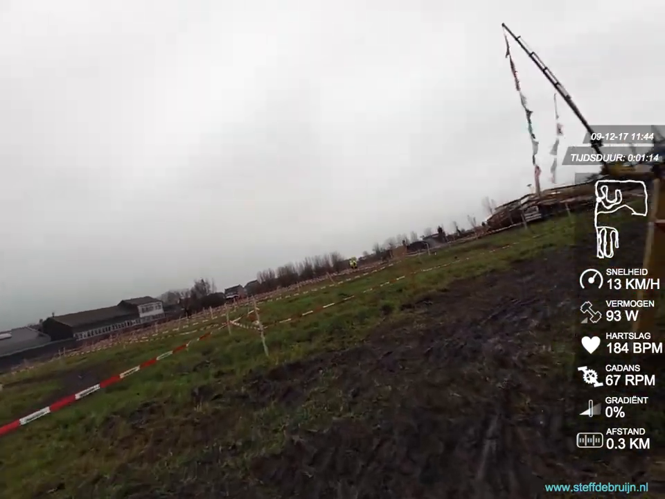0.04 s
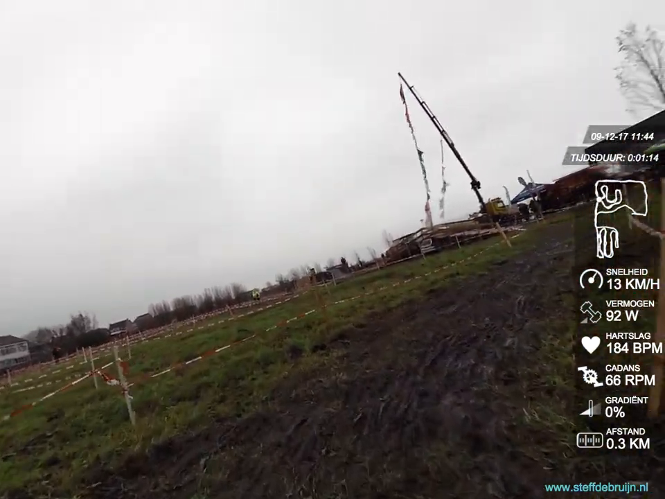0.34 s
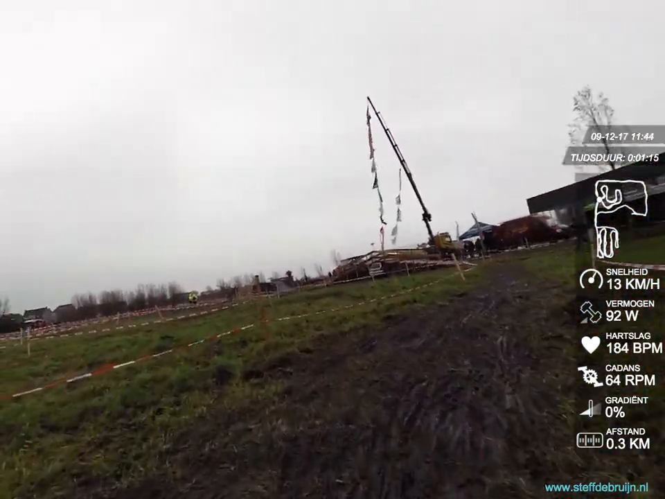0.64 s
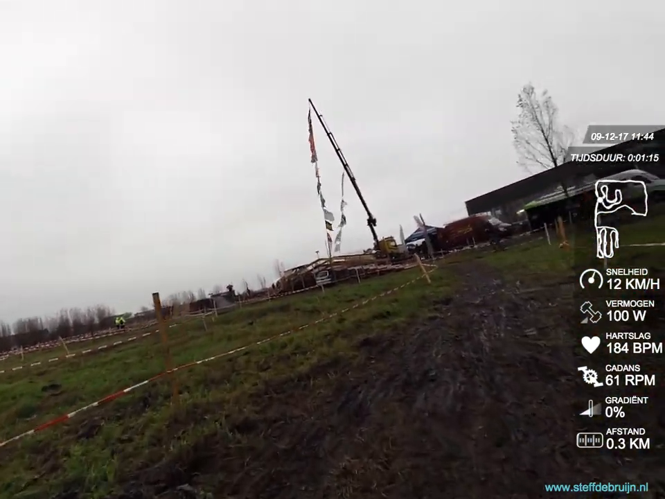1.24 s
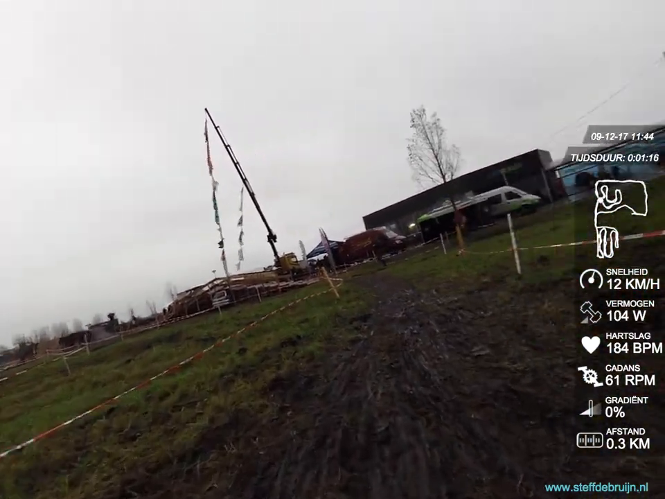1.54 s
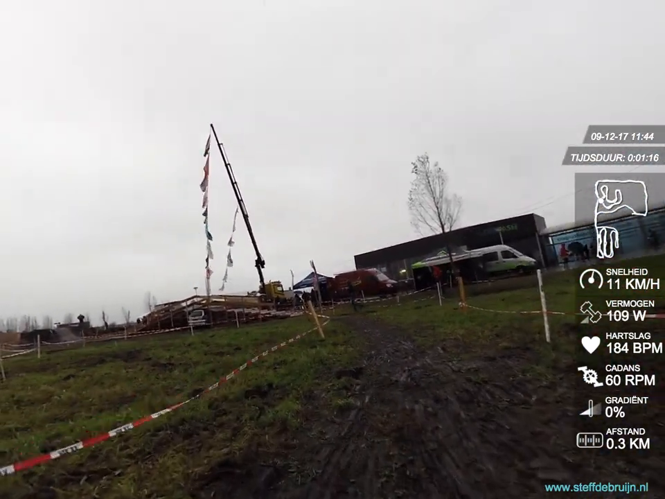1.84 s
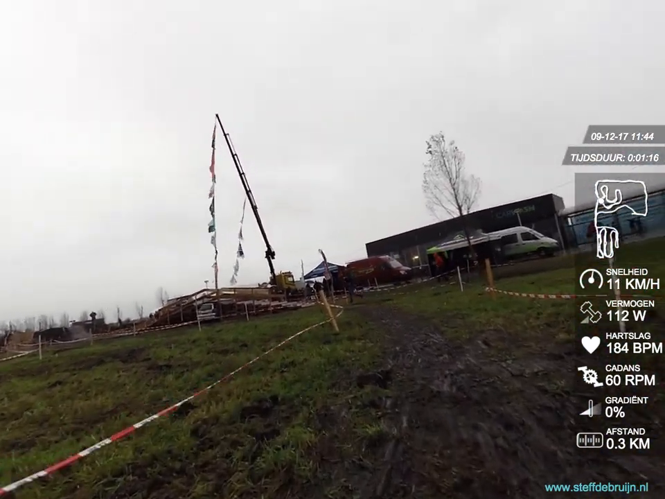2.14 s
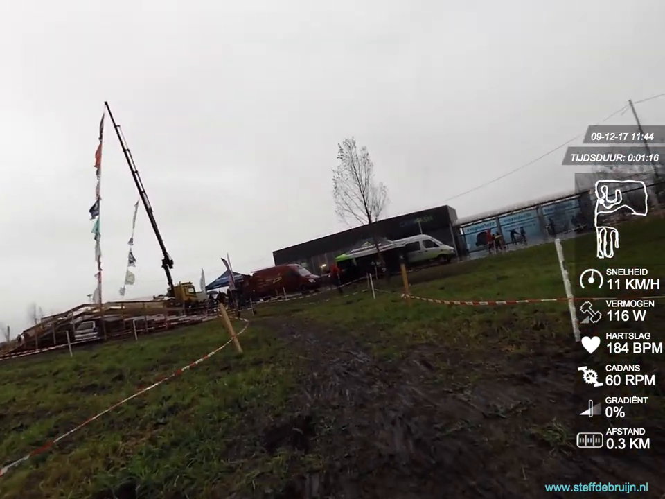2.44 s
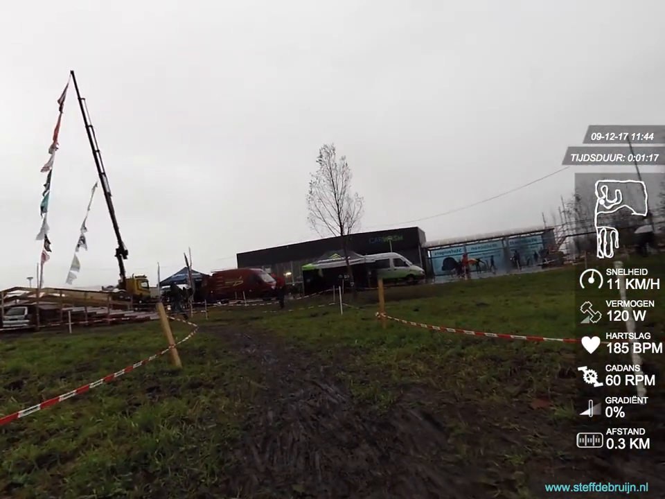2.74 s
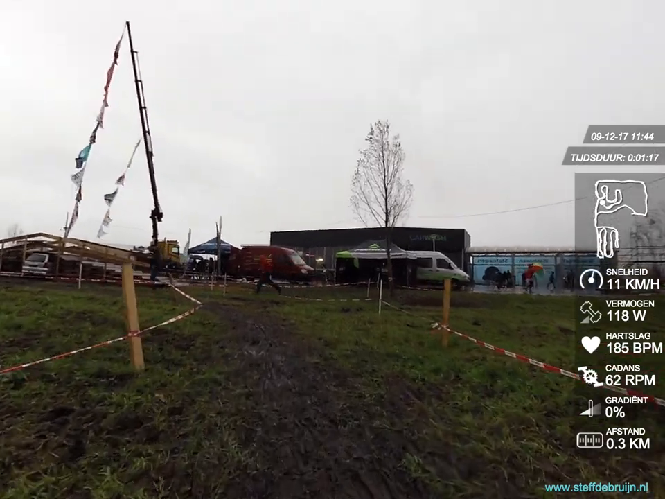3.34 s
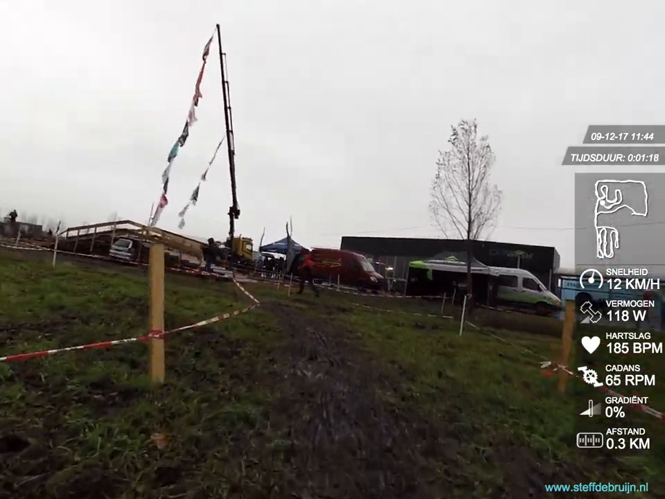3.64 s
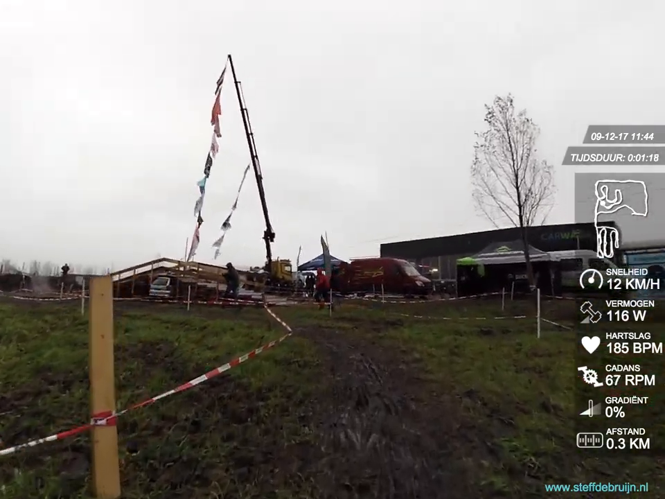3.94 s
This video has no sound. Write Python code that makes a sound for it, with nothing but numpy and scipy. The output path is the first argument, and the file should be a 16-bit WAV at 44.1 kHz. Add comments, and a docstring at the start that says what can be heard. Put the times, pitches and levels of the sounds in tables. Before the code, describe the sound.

A bicycle rolls slowly over a rutted muddy track, heard from a microphone fixed to it. Its hollow drone and bright ring carry constant short rattles, occasional thumps and sharp ticks, with a thin chain whistle and faint wind rumble.

```python
"""On a rutted muddy track, a bicycle rolls slowly along, heard from a camera fixed to it.
Tyres and chain shake the frame and the camera housing, which ring at fixed pitches:
a hollow drone near 500 Hz and a bright ring near 2.5 kHz. The chain adds a thin whistle.
Bumps set off short rattles, the wheels thump into ruts, and stones and loose parts
tick against the bike. Wind rumbles underneath."""
import sys
import numpy as np
from scipy import signal
from scipy.fft import rfft, irfft
from scipy.io import wavfile
from scipy.ndimage import uniform_filter1d, minimum_filter1d

SR = 44100
rng = np.random.default_rng(int(sys.argv[2]) if len(sys.argv) > 2 else 0)


def wrap_up_sound(samples):
    """Save the sound to the file named by the first command line argument, as 16-bit audio."""
    columns = np.atleast_2d(samples).T
    # keep every value between -1 and 1, then stretch to whole-number steps
    tamed = np.clip(columns, -1, 1)
    steps = np.round(tamed * 32767).astype(np.int16)
    wavfile.write(sys.argv[1], SR, steps)


N = 176400
TIME = np.arange(N) / SR
FREQS = np.maximum(np.arange(N + 1) * SR / (2 * N), 1)

# Overall tone of the body (frame and housing): frequency_hz, level_db
BODY_COLOUR = [(25, -27.5), (45, -27.5), (70, -18), (110, -3.5), (240, -3.5), (740, 4.5), (860, -16),
               (2150, -22.5), (2750, -16.5), (3050, -19.5), (3700, -25.5), (3900, -11), (4780, -15),
               (4980, -20), (5200, -27), (6300, -51.5), (7000, -61.5), (8200, -62), (9000, -73.5)]
# Pitches at which the body rings: pitch_hz, width_hz, boost_db
BODY_RESONANCES = [(101.3, 14, 15), (152, 75, 8.5), (305.6, 82, 13), (413, 110, 4), (491.2, 50.3, 14.5),
                   (610, 23, 2.5), (941, 120, 9.5), (1162.6, 128, 17), (1289, 54, 9), (1444, 180, 14),
                   (1884, 324, 17), (2364, 130, 6.5), (2469, 408, 25), (2473, 39, 4), (3254, 220, 10.5),
                   (3483, 98, 11.5), (4560, 190, 6.5)]
# Edges of five bands, low to high (boom, thud, clatter, ring, sizzle): edge_hz
BAND_EDGES_HZ = [70, 220, 900, 2200, 3000, 11000]
# Rolling noise over time, before the offsets below: time_s, thud_db, clatter_db, ring_db, sizzle_db
ROLLING_LEVELS = [(0.0, -33.5, -41, -30, -32), (0.13, -29, -35.5, -30, -40), (0.26, -30, -37, -31.5, -36.5),
                  (0.76, -27.5, -40, -32.5, -40.5), (1.24, -27, -37, -28, -36.5),
                  (1.61, -29, -40, -32, -40.5), (1.78, -27.5, -39, -31, -38.5),
                  (2.25, -28, -39.5, -31, -40), (2.37, -26.5, -36.5, -30, -35),
                  (2.56, -28, -41.5, -36, -39.5), (2.71, -28.5, -39, -30, -40),
                  (2.93, -28.5, -35, -30, -37), (3.12, -28.5, -42, -32.5, -40),
                  (3.34, -28, -36.5, -29, -37), (3.49, -29, -39, -31.5, -38),
                  (3.69, -26.5, -39.5, -29, -38.5), (3.82, -27, -37.5, -32.5, -36),
                  (4.0, -22, -36, -29.5, -38)]
# One row each for the rolling thud, clatter, ring and sizzle: offset_db, flutter_db
ROLLING_BANDS = [(2, 1.93), (1.1, 2.2), (0.78, 3), (-1.5, 2.5)]
# Brief changes in the rolling noise, nearly all of them dips: time_s, change_db
LULLS = [(.008, -1.5), (0.246, -1.5), (.436, -3), (0.759, 1.5), (0.858, -1.5), (0.967, -3.5), (1.079, -2.5),
         (1.278, -4), (1.612, -1), (1.9, -3), (2.09, -5.5), (2.314, -2.5), (2.38, -6.5), (2.767, -8),
         (2.803, -2.5), (2.875, -6.5), (3.19, -4.5), (3.225, -3), (3.814, -3.5), (3.945, -6)]
# Bumps that shake the bike: peak_s, decay_s, thud_pitch_hz, thud_db, clatter_db, ring_db
JOLTS = [(0.03, 0.0058, 433, -32, -51, -14), (0.065, 0.014, 301, -20, -42, -35),
         (0.135, 0.011, 481, -16, -42, -30), (0.187, 0.0088, 497.8, -12, -34, -33),
         (0.231, 0.0068, 315, -24, -34, -24), (0.292, 0.0063, 608, -21, -37, -17.5),
         (0.341, 0.013, 257, -21, -29, -16), (0.385, 0.011, 506, -18, -31.5, -19.5),
         (0.411, 0.011, 532, -31, -23.5, -21), (0.456, 0.012, 423, -36, -42, -19.5),
         (0.496, 0.0097, 300, -14, -34, -22.5), (0.535, 0.0054, 520, -19, -31, -48),
         (0.554, 0.012, 484, -11, -27.5, -45), (0.608, 0.022, 507, -22.5, -25, -20.5),
         (0.652, 0.012, 497, -24, -27, -27), (0.705, 0.009, 474.4, -15.5, -30, -18.5),
         (0.721, 0.0052, 460, -28, -23, -14.5), (0.804, .011, 490, -12.5, -39.5, -20.5),
         (0.832, 0.015, 515.7, -17.5, -47, -44), (0.927, .009, 727, -17, -37, -24),
         (0.99, 0.0087, 505.4, -23.5, -32, -18.5), (1.015, 0.016, 391, -17, -45, -25),
         (1.043, 0.01, 479, -17.5, -27, -23.5), (1.149, 0.0076, 312, -13.5, -31, -20.5),
         (1.178, 0.014, 504, -16, -40, -36), (1.324, 0.013, 487.5, -6.5, -40, -38),
         (1.4525, 0.0097, 479, -13, -20, -9.5), (1.466, 0.014, 453.6, -16, -30, -17),
         (1.5, 0.0083, 464, -35, -31, -18.5), (1.529, 0.016, 509.5, -18, -32, -16.5),
         (1.649, 0.01, 515, -12, -17.5, -15.5), (1.658, 0.0074, 628, -10, -30, -8.5),
         (1.667, 0.0098, 463, -14, -27, -14.5), (1.71, .008, 691.5, -10, -22, -14.5),
         (1.808, 0.012, 529, -15.5, -51, -49), (1.877, 0.01, 476, -13, -28.5, -29),
         (1.92, 0.0037, 296.5, -30, -39, -21.5), (1.968, 0.0052, 487, -17, -24.5, -13),
         (1.992, 0.024, 490, -16.5, -34.5, -36), (2.034, 0.0084, 433, -30, -37, -20.5),
         (2.112, 0.01, 424, -11.5, -27, -29), (2.152, 0.011, 431.4, -13.5, -42, -25),
         (2.213, 0.013, 484, -18, -35, -21.5), (2.259, 0.0057, 461.6, -13, -24.5, -15.5),
         (2.283, 0.011, 516.4, -8, -50.5, -48), (2.366, 0.0047, 357, -12.5, -26, -20),
         (2.475, 0.0072, 356, -17, -26.5, -17), (2.513, 0.0095, 284, -21, -31, -21),
         (2.559, 0.0088, 463, -14, -24, -18), (2.59, 0.0051, 475, -15, -25, -15.5),
         (2.612, 0.014, 570, -15, -25, -24), (2.641, 0.0067, 485, -9.5, -26, -27),
         (2.655, 0.0105, 556, -19.5, -31, -23), (2.72, 0.0078, 482, -17.5, -29.5, -29),
         (2.74, 0.006, 598, -14, -41, -43), (2.839, 0.013, 513, -14.5, -32, -19.5),
         (2.857, 0.0066, 286, -17, -49, -36), (2.909, 0.011, 491.5, -11, -28, -28),
         (2.99, 0.01, 493, -21.5, -24.5, -17), (3.037, 0.01, 517, -13, -52, -46),
         (3.083, 0.0085, 374, -18, -26, -25), (3.108, 0.0059, 623, -12.5, -37, -27),
         (3.16, 0.0079, 618, -8.5, -28, -25), (3.172, .009, 478, -26, -44, -28),
         (3.278, 0.012, 482, -14.5, -25, -20.5), (3.31, 0.0081, 486, -15.5, -42, -26),
         (3.414, 0.015, 491.6, -11.5, -31, -24), (3.476, 0.0082, 475.4, -12, -28.5, -18),
         (3.509, 0.01, 496, -14, -26, -23), (3.635, 0.0082, 439, -19.5, -25.5, -23),
         (3.678, .014, 491.5, -15, -40, -26), (3.706, 0.0073, 349.7, -21.5, -28.5, -18.5),
         (3.736, 0.011, 504, -24, -44, -42), (3.8, 0.0085, 486.3, -14.5, -43, -26),
         (3.844, 0.0066, 338.8, -7.5, -23.5, -26), (3.866, 0.012, 444, -17, -28.5, -22.5),
         (3.9095, 0.0068, 475, -2, -27, -43), (3.992, 0.012, 393.3, -4, -26, -22.5)]
# Added to every jolt's thud, clatter and ring: offset_db
JOLT_OFFSETS_DB = [-5.5, -4.5, -3.5]
# A wheel drops into a rut: peak_s, pitch_hz, level_db
THUMPS = [(0.895, 151.5, -21.5), (1.146, 157, -24), (1.318, 135, -29), (1.443, 150.9, -24.5),
          (2.404, 162, -27.5), (2.68, 229, -21.5), (2.747, 227, -26), (2.782, 130.3, -29.5),
          (3.083, 181, -24.5), (3.16, 302.6, -19), (3.856, 172.4, -25), (3.908, 154, -17.5),
          (3.992, 157, -15)]
# Stones and loose parts hit the bike: time_s, crack_db, knock_db, knock_pitch_hz, snap_db
TICKS = [(0.411, -37, -22, 4000, -79.5), (1.452, -29, -25, 2500, -40), (1.4545, -27, -26, 2505, -45),
         (1.597, -13.5, -17, 3600, -41), (1.649, -17, -21, 1900, -43), (1.666, -32, -19.5, 1900, -55),
         (2.364, -34, -25, 1400, -80), (2.738, -25, -11.5, 3280, -79), (2.740, -34, -12.5, 925, -82),
         (3.157, -40, -18, 1790, -80), (3.411, -34, -20, 4100, -80), (3.839, -23, -12, 1700, -62),
         (3.845, -18, -8.5, 1720, -45), (3.98, -28, -14, 3300, -63), (3.990, -20, -8.5, 1655, -57)]
# Tone of a tick's sharp crack, lower knock and thin, high snap: frequency_hz, level_db
CRACK_COLOUR = [(500, -20), (2500, -22.5), (3500, 0.5), (4500, 0.5), (5500, -12), (6400, -24), (7100, -48),
                (12000, -70)]
KNOCK_COLOUR = [(60, -31), (400, -7), (700, -1), (930, 2), (1250, -8), (1700, -3), (2500, -8.5),
                (3300, -5.5), (4500, -14.5), (6000, -49), (7500, -75)]
SNAP_COLOUR = [(3000, -46.5), (6300, 6.5), (9800, -2), (11800, -11), (13000, -32)]
# Path of the whistle in the chain's hiss: time_s, pitch_hz
WHISTLE_PITCH = [(0.0, 4480), (0.23, 4420), (0.26, 4080), (0.33, 4600), (0.41, 4100), (0.52, 4425),
                 (1.0, 4415), (1.1, 4300), (1.38, 4457), (1.87, 4210), (1.92, 4370), (2.21, 4470),
                 (2.27, 4250), (2.31, 4460), (2.75, 4320), (2.77, 4483), (2.91, 4130), (2.97, 4490),
                 (3.17, 4160), (3.31, 4610), (3.43, 4390), (3.54, 4480), (3.82, 4280), (3.93, 4460),
                 (4.0, 4140)]
# The deepest sounds over time, before their boosts: time_s, wind_db, boom_db
BASS_LEVELS = [(0.0, -63, -37), (0.65, -65, -36.5), (0.78, -65, -39), (1.05, -59.5, -37.5),
               (1.48, -61.5, -39), (2.22, -58.5, -35), (2.38, -48.5, -35.5), (2.67, -59, -35.5),
               (2.72, -39, -29), (2.92, -73, -39.5), (3.1, -42.5, -33), (3.22, -76, -40),
               (3.41, -48.5, -30), (3.44, -62, -35.5), (3.75, -64, -34.5), (3.96, -70, -34)]


def rolling(ground_db, boom_boost_db=3):
    """Tyres and chain keep the body sounding; each band above the boom also flutters on its own."""
    boom, *bands = shaken_body()
    _, boom_db = over_time(BASS_LEVELS)
    out = from_db(boom_db + boom_boost_db) * steady(boom, window=3500)
    for band, db, (offset_db, flutter_db) in zip(bands, over_time(ROLLING_LEVELS), ROLLING_BANDS):
        level_db = db + offset_db + ground_db + flutter_db * wander(rate_hz=33.4)
        out += from_db(level_db) * steady(band, window=700)
    return out


def shaken_body():
    """Grit rings the frame and housing; gives boom, thud, clatter, ring and sizzle at equal strength."""
    resonances_db = sum(boost_db / (1 + (2 * (FREQS - pitch_hz) / width_hz) ** 2)
                        for pitch_hz, width_hz, boost_db in BODY_RESONANCES)
    sound = apply_colour(grit(), colour(BODY_COLOUR) + resonances_db)
    return [unit_level(signal.sosfiltfilt(band_filter(edges_hz, order=6), sound))
            for edges_hz in zip(BAND_EDGES_HZ, BAND_EDGES_HZ[1:])]


def grit(grains_per_s=3200, spread_db=3.5, friction_gain=0.51):
    """Many tiny impacts of uneven size over a smooth rubbing noise."""
    sizes = from_db(spread_db * np.minimum(rng.exponential(1, N), 4))
    signs = rng.choice([-1, 1], N)
    hits = rng.random(N) < grains_per_s / SR
    return unit_level(sizes * signs * hits) + friction_gain * rng.standard_normal(N)


def ground_flutter(flutter_db=0.9, lull_s=0.014):
    """Uneven ground makes the level flutter and briefly dip; gives the change in dB."""
    lulls_db = sum(db * np.exp(-((TIME - time_s) / lull_s) ** 2) for time_s, db in LULLS)
    return lulls_db + flutter_db * wander(rate_hz=33.4)


def jolts(sizzle_offset_db=-7):
    """Bumps rattle the same body, some with a hollow thud, some with a bright ring."""
    _, thud, clatter, ring, sizzle = shaken_body()
    _, _, _, *levels_db = np.transpose(JOLTS)
    envelopes = [jolt_envelope(db) for db in levels_db]
    thud_envelope, clatter_envelope, _ = envelopes
    # A thud is about half noise and half tone.
    thud = thud * (thud_envelope + 1e-6) + hollow_knocks(JOLTS, waver_hz=36.8)
    out = sizzle * clatter_envelope * from_db(sizzle_offset_db)
    for band, envelope, offset_db in zip((thud, clatter, ring), envelopes, JOLT_OFFSETS_DB):
        out += steady(band, window=300) * envelope * from_db(offset_db)
    return out


def jolt_envelope(levels_db):
    """How strongly the jolts shake one band at each moment."""
    out = np.zeros(N)
    for (peak_s, decay_s, *_), db in zip(JOLTS, levels_db):
        span, strength = bump(peak_s, decay_s)
        out[span] += from_db(db) * strength
    return out


def bump(peak_s, decay_s, hold_s=0.0027):
    """A bump swells, holds and dies away; gives the samples it covers and its strength there."""
    span = slice(max(int((peak_s - 0.04) * SR), 0), int((peak_s + 0.15) * SR))
    before_s = np.maximum(peak_s - TIME[span] - hold_s / 2, 0)
    after_s = np.maximum(TIME[span] - peak_s - hold_s / 2, 0)
    rise_s = 0.69 * decay_s
    fade = (before_s / rise_s) ** 2 + after_s / decay_s
    return span, np.exp(-np.minimum(fade, 20))


def hollow_knocks(rows, waver_hz):
    """Each knock rings for a few cycles, wavering around a pitch of its own."""
    out = np.zeros(N)
    bend_hz = waver_hz * wander(rate_hz=62.3)
    for peak_s, decay_s, pitch_hz, db, *_ in rows:
        span, strength = bump(peak_s, decay_s)
        out[span] += from_db(db) * strength * tone(pitch_hz + bend_hz[span])
    return out


def rut_thumps(decay_s=0.013):
    """A wheel dropping into a rut makes a deep, short knock."""
    rows = [(peak_s, decay_s, pitch_hz, db) for peak_s, pitch_hz, db in THUMPS]
    return hollow_knocks(rows, waver_hz=18)


def ticks(tick_decay_s=0.00077, knock_decay_s=0.0024, ring_boost_db=9):
    """Stones and loose parts hit the bike: a crack, a thin snap and a short, ringing knock."""
    crack_click, knock_click, snap_click = [apply_colour(signal.unit_impulse(N), colour(points))[:1024]
                                            for points in (CRACK_COLOUR, KNOCK_COLOUR, SNAP_COLOUR)]
    out = np.zeros(N + SR)
    for time_s, crack_db, knock_db, pitch_hz, snap_db in TICKS:
        knock = contact(knock_click, knock_decay_s)
        ring = signal.lfilter(*signal.iirpeak(pitch_hz, Q=5, fs=SR), knock)
        knock += from_db(ring_boost_db) * ring
        crack = contact(crack_click, tick_decay_s)
        snap = contact(snap_click, tick_decay_s)
        start = int((time_s - tick_decay_s) * SR)
        for hit, db in (crack, crack_db), (knock, knock_db), (snap, snap_db):
            out[start:start + len(hit)] += from_db(db) * hit / np.abs(hit).max()
    return out[:N]


def contact(click, decay_s):
    """One hard touch: a very short burst of noise that takes on the tone of the click."""
    burst = steady(rng.standard_normal(1024), window=16) * np.exp(-TIME[:1024] / decay_s)
    return np.convolve(burst, click)


def chain_whistle(ground_db, base_db=-40.5, waver_hz=60.38):
    """The chain hisses in a narrow band, like a thin whistle whose pitch wanders."""
    pitch_hz = over_time(WHISTLE_PITCH)[0] + waver_hz * wander(rate_hz=18)
    flickering_tone = wander(rate_hz=89) * tone(pitch_hz)
    hiss = signal.sosfilt(band_filter([3800, 4950], order=4), flickering_tone)
    return from_db(base_db + ground_db) * steady(hiss, window=700)


def wind(boost_db=2.5):
    """Air buffets the housing: a deep, lumpy rumble."""
    rumble = signal.sosfilt(band_filter([42, 85], order=2), rng.standard_normal(N + SR))[SR:]
    wind_db, _ = over_time(BASS_LEVELS)
    return from_db(wind_db + boost_db) * steady(rumble, window=3500)


def from_db(db):
    """Turn decibels into a number to multiply a sound by."""
    return 10 ** (np.asarray(db) / 20)


def unit_level(sound):
    """Scale a sound so that its average level (rms) is 1."""
    return sound / np.sqrt(np.mean(sound ** 2) + 1e-20)


def steady(sound, window):
    """Keep the level near 1, smoothing out swells longer than the window (in samples)."""
    power = uniform_filter1d(uniform_filter1d(sound ** 2, window), window)
    return sound / np.sqrt(np.abs(power) + 1e-20)


def wander(rate_hz, step=40):
    """A smooth random curve of typical size 1; a higher rate makes it move faster."""
    memory = np.exp(-2 * np.pi * rate_hz * step / SR)
    noise = rng.standard_normal(N // step + 2002)
    slow = signal.lfilter([1], [1, -2 * memory, memory ** 2], noise)[2000:]  # skip the settling
    return np.interp(np.arange(N) / step, np.arange(len(slow)), unit_level(slow))


def tone(pitch_hz):
    """A pure tone of average level 1 that follows a moving pitch."""
    return np.sqrt(2) * np.sin(2 * np.pi * (np.cumsum(pitch_hz) / SR + rng.random()))


def over_time(rows):
    """Join a table's points with straight lines: one curve for each column after the time."""
    times_s, *columns = np.transpose(rows)
    return [np.interp(TIME, times_s, column) for column in columns]


def colour(points):
    """Join a table's points into a level in dB for every frequency."""
    frequency_hz, level_db = np.transpose(points)
    return np.interp(np.log(FREQS), np.log(frequency_hz), level_db)


def apply_colour(sound, curve_db):
    """Turn each frequency up or down; ringing follows a hit and never leads it (minimum phase)."""
    cepstrum = irfft(np.log(from_db(curve_db)))
    cepstrum[1:N] *= 2
    cepstrum[N + 1:] = 0
    return irfft(rfft(sound, 2 * N) * np.exp(rfft(cepstrum)))[:N]


def band_filter(edges_hz, order):
    """A filter that keeps what lies between two frequencies; a higher order cuts more sharply."""
    return signal.butter(order, edges_hz, "band", fs=SR, output="sos")


def scene():
    """Everything reaches one microphone inside the housing."""
    ground_db = ground_flutter()
    bike = rolling(ground_db) + jolts() + rut_thumps() + ticks() + chain_whistle(ground_db)
    return (bike + wind())[None]


def record(dry, limit_db=-4.5, cutoff_hz=13200):
    """A fast limiter turns the hardest knocks down, then the highest treble is cut."""
    gain = np.minimum(1, from_db(limit_db) / (np.abs(dry) + 1e-9))
    gain = minimum_filter1d(gain, size=257)
    gain = uniform_filter1d(uniform_filter1d(gain, size=129), size=129)
    return signal.sosfilt(signal.cheby2(12, 70, cutoff_hz, fs=SR, output="sos"), dry * gain)


dry = scene()
out = record(dry)
wrap_up_sound(out)
```